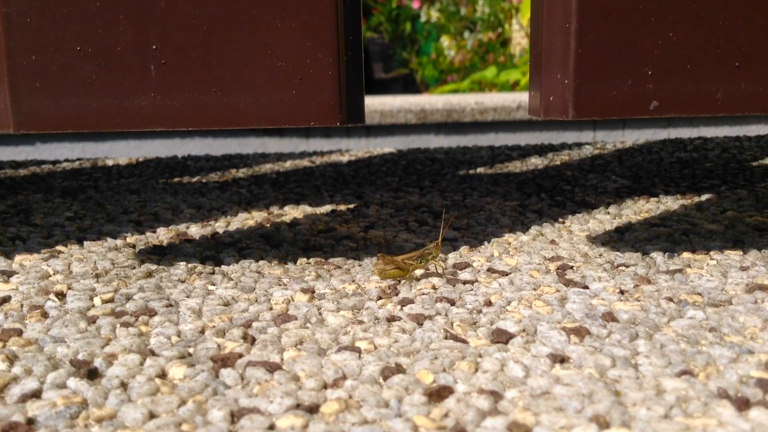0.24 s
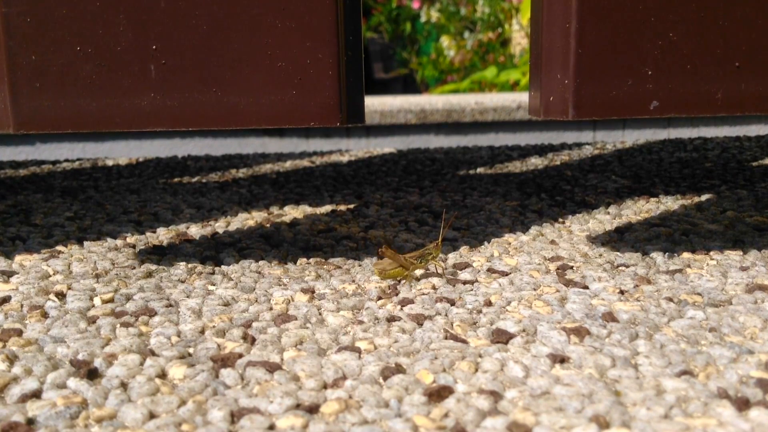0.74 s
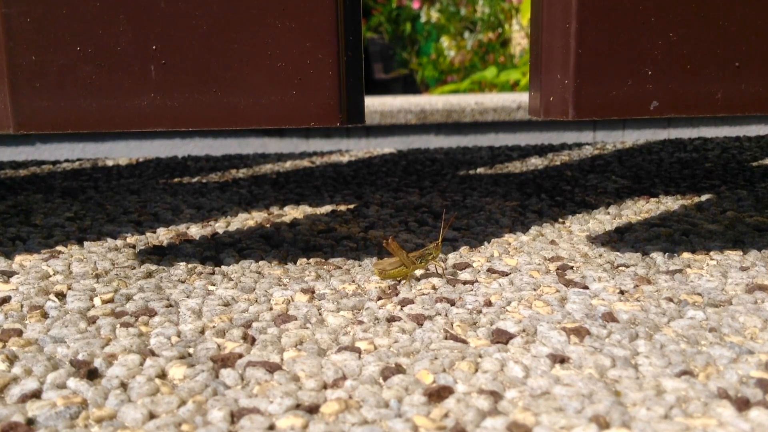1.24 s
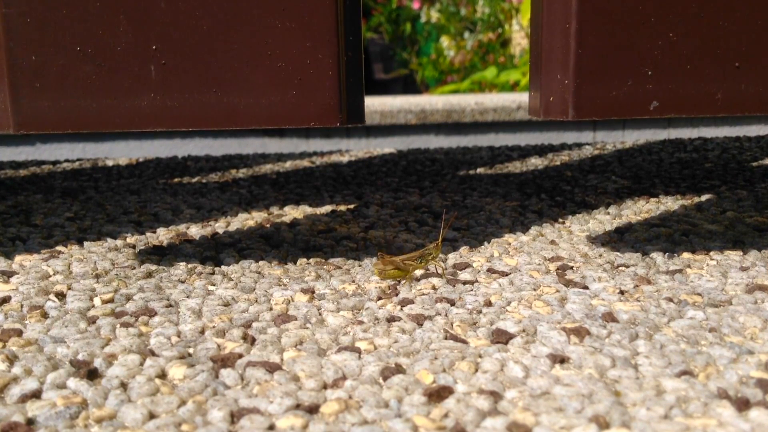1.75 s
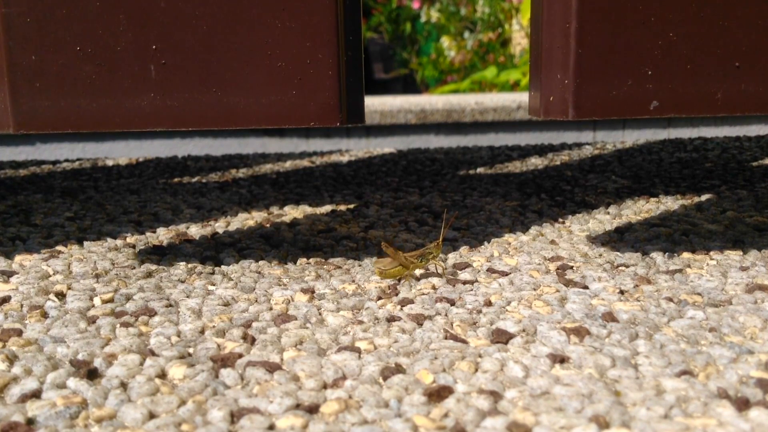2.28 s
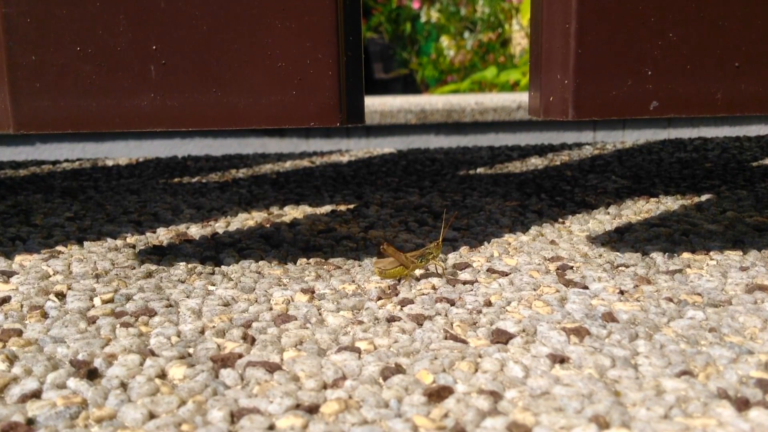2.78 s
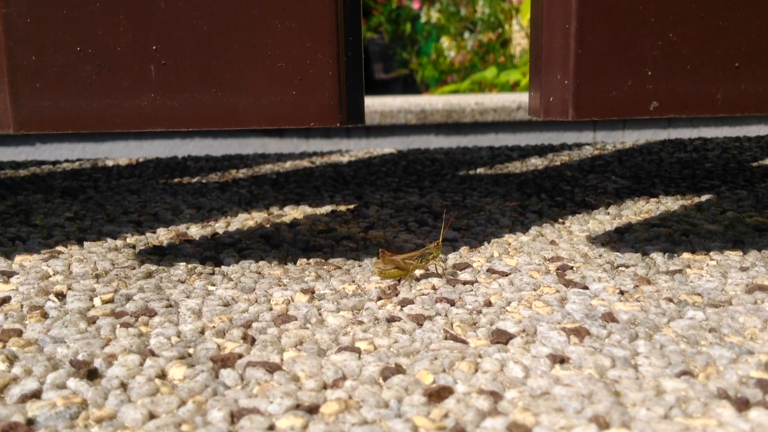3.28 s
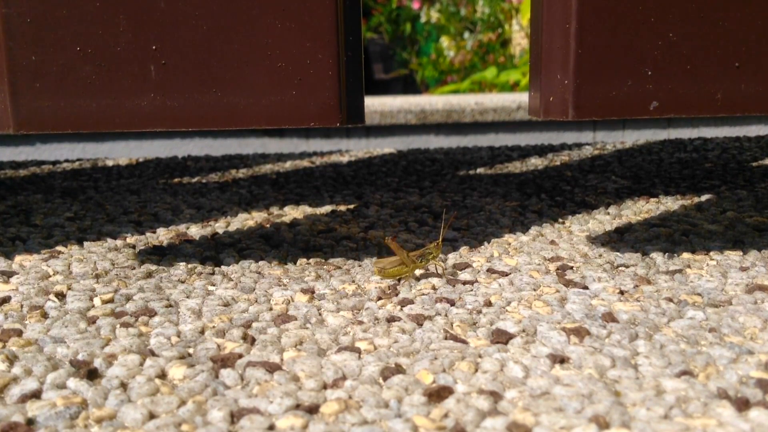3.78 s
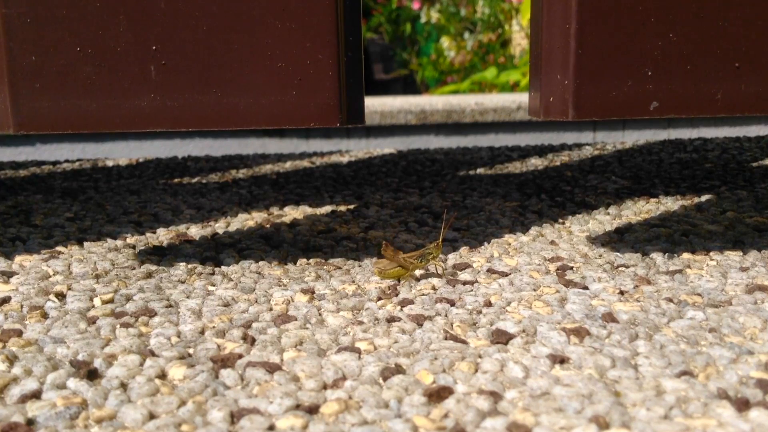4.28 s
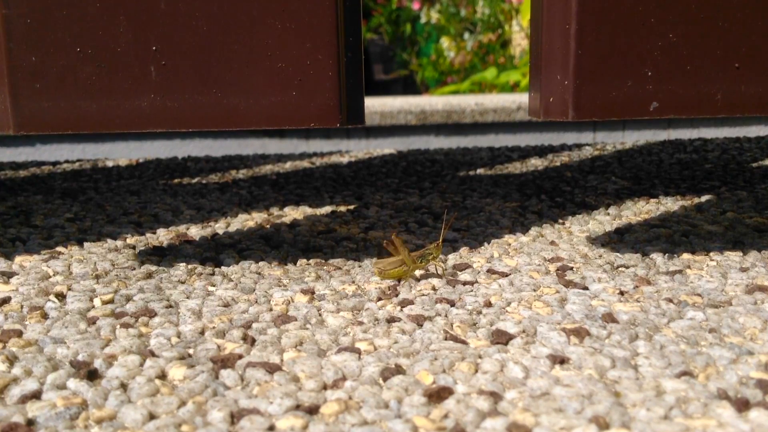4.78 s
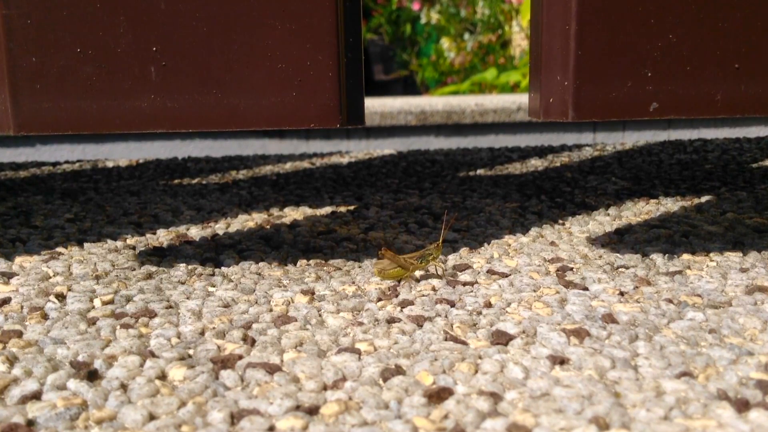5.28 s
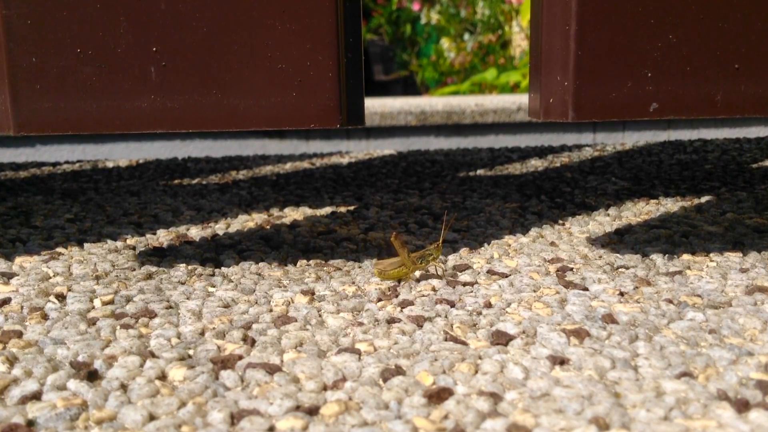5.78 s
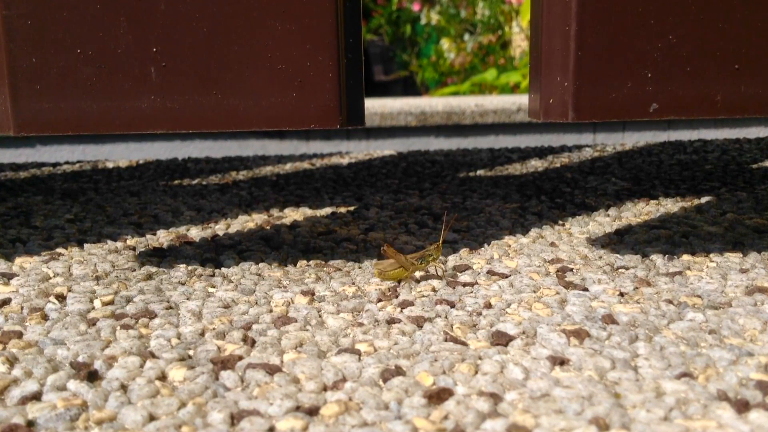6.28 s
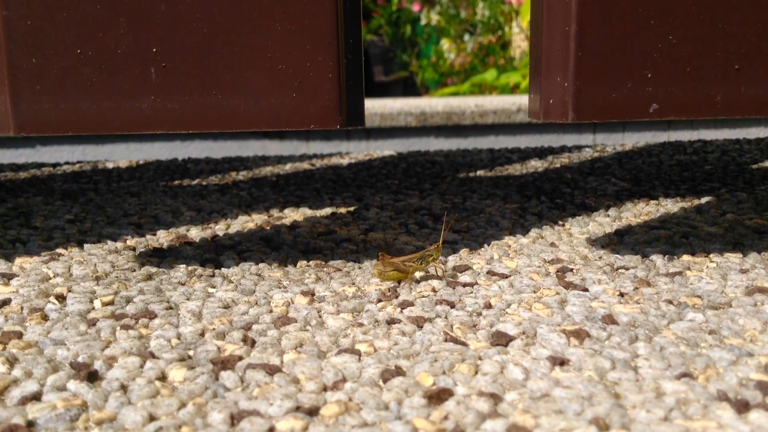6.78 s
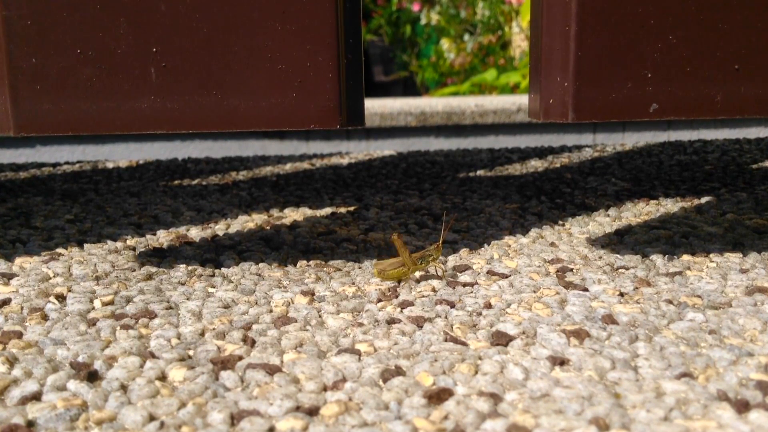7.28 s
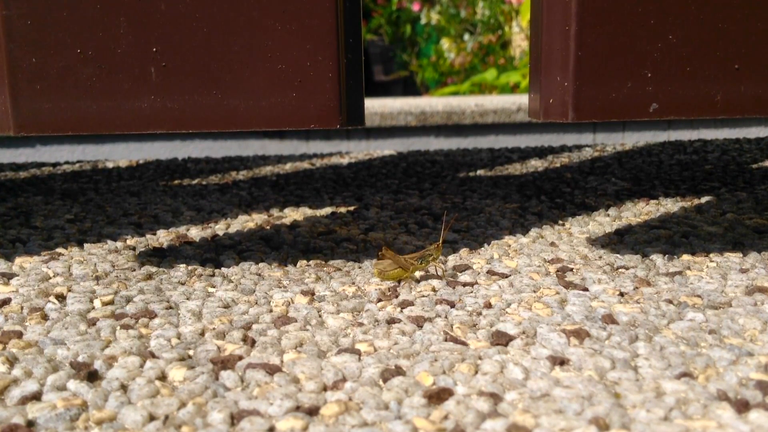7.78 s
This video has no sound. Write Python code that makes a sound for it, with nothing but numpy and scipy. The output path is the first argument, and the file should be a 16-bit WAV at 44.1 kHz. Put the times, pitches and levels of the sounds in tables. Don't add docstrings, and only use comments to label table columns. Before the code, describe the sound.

Outdoors, near the ground, a grasshopper gives a rapid pulsing buzz, very high and scratchy with no bass. Each pulse pairs a quick falling zip with two grainy scrapes. It falters once near the start, clicking irregularly, then picks up again slightly faster and keeps swelling. Pebbles add a very short scatter. A quiet distant motor comes and goes on the wind over faint hum and air. The sound is single-channel.

```python
import sys
import numpy as np
from scipy import signal
from scipy.fft import rfft, irfft, next_fast_len
from scipy.io import wavfile
from scipy.ndimage import uniform_filter1d, map_coordinates

SR = 44100
rng = np.random.default_rng(int(sys.argv[2]) if len(sys.argv) > 2 else 0)


def invert_db(level):
    return 10 ** (np.asarray(level, dtype=float) / 20)


def inscribe(sig):
    pcm = np.round(np.clip(np.atleast_2d(sig).T, -1, 1) * 32767)
    wavfile.write(sys.argv[1], SR, pcm.astype(np.int16))


N = 355005
TIME = np.arange(N) / SR

# (time [s], level of order 2 [dB], level of order 3 [dB])
ENGINE = [(0, -47, -58.5), (.3, -49, -51), (.6, -52, -54.5), (1.2, -59, -80), (1.7, -66.5, -66.5),
          (2.2, -72, -74), (2.8, -70.5, -87), (3.2, -54, -51.5), (3.45, -52, -60), (3.75, -51, -56),
          (4.05, -67, -52.5), (4.4, -61, -77), (5.1, -66, -87), (5.8, -55, -62), (6.1, -55.5, -70),
          (6.8, -53.5, -62.5), (7.4, -72, -65.5), (7.85, -56, -63)]
# (frequency [Hz], level [dB])
LOW = [(2600, -34.5), (3300, -21), (3900, -15.5), (4600, -6.5), (5500, -1.5), (6300, 0), (7500, -12)]
# (time [s], peak level [dB], halt before it [ms], hiss around it [dB])
OPENING = [
    (0.0165, -31.5, 12.7, -62),
    (.25, -21.5, 11, -62),
    (0.4862, -22.5, 8.3, -81),
    (.722, -22, 9.7, -55),
    (0.9578, -23.5, 7.5, -62),
    (1.1945, -21, 7.2, -59),
    (1.4276, -23, 9.6, -60),
    (1.654, -21, 7.4, -80),
    (1.881, -20.5, 8.4, -52),
    (2.1123, -20.5, 9.2, -83),
]
# (time [s], peak level [dB], halt before it [ms], hiss around it [dB])
RESUMED = [(2.3129, -30.5, 66, -63.5), (2.5308, -21, 6.7, -79), (2.7548, -20.5, 7.4, -60),
           (2.9734, -22.5, 2.7, -53), (3.1972, -21, 8.3, -56), (3.4175, -21.5, 2.34, -53),
           (3.638, -20.5, 1.8, -60), (3.8603, -19, 6, -55.5), (4.0793, -20, 1.8, -49),
           (4.301, -19.5, 6.9, -60), (4.519, -17.5, 8.8, -53), (4.7377, -18, 2.37, -49),
           (4.9555, -15.5, 6.2, -60.5), (5.1697, -16.5, 7, -64), (5.3905, -16, 8.2, -87),
           (5.6075, -16.5, 1.66, -56), (5.823, -15, 3.4, -45), (6.0381, -17, 5.9, -47),
           (6.256, -14.5, 6.2, -56), (6.4742, -16.5, 1.74, -47), (6.6939, -14, 5.9, -56),
           (6.912, -15.5, 1.9, -62), (7.1267, -16.5, 0.88, -45.6), (7.3404, -14, 6.2, -79),
           (7.5514, -15.5, 1.43, -83), (7.7668, -13.5, 6.5, -60), (7.982, -14.5, 9.6, -52)]


def along(points, hz):
    f, v = np.transpose([(0.53, -120)] + list(points))
    return np.interp(np.log(hz + 1), np.log(f + 1), v)


def curves(rows, at):
    places, *columns = np.transpose(rows)
    return [np.interp(at, places, column) for column in columns]


def wobble(rate):
    return map_coordinates(rng.standard_normal(int(N * rate / SR) + 4), [TIME * rate])


def coloured(x, points):
    level_db = along(points, np.fft.rfftfreq(8192, 1 / SR))
    cepstrum = irfft(np.log(invert_db(level_db) + 1e-6))
    cepstrum[1:4096] *= 2
    cepstrum[4097:] = 0
    ring = irfft(np.exp(rfft(cepstrum)))[:4096]
    return signal.fftconvolve(x, ring / np.linalg.norm(ring))[:N]


def patchy(depth_db):
    z = signal.stft(rng.standard_normal(N), nperseg=1024)[2]
    field = uniform_filter1d(rng.standard_normal(z.shape), size=3, axis=0)
    field = uniform_filter1d(field, size=7, axis=1)
    x = signal.istft(z * invert_db(depth_db * field / field.std()), nperseg=1024)[1][:N]
    return x / x.std()


def air():
    # (time [s], level [dB])
    breeze = [(0, -64), (2.7, -63), (4.4, -61.5), (5.3, -65.5), (6, -61), (6.7, -59.5), (7.2, -63),
              (8.05, -62.5)]
    # (frequency [Hz], level [dB per Hz])
    air_colour = [(150, -6), (400, -2.5), (900, 1), (1500, -3), (2000, -8.5), (2600, -7.5), (4000, -13),
                  (8000, -20), (15000, -34)]
    level_db = curves(breeze, TIME)[0] + 1.5 + 0.44 * wobble(4.8)
    return invert_db(level_db) * coloured(patchy(depth_db=2.5), air_colour)


def traffic():
    # (time [s], level [dB])
    passing = [(0, -75.5), (1.4, -68.5), (3.6, -69), (6.3, -81), (8.05, -72)]
    # (frequency [Hz], level [dB per Hz])
    deep = [(20, -19), (70, -17), (100, -4), (130, 8.5), (170, -1.5), (250, -29)]
    level_db = curves(passing, TIME)[0] + 3.0 + 0.89 * wobble(2.85)
    return invert_db(level_db) * coloured(rng.standard_normal(N), deep)


def engine_nearness():
    return uniform_filter1d(np.maximum(*curves(ENGINE, TIME)), size=SR // 4) + 55


def hum():
    # (frequency [Hz], level [dB rms])
    lines = [(126.5, -76.5), (382, -73)]
    drone_hz, rise_db_per_s = 262, 1.84
    drone_db = -71 + 0.89 * engine_nearness() + rise_db_per_s * TIME
    total = np.zeros(N)
    for hz, db in lines + [(drone_hz, drone_db), (2 * drone_hz, drone_db - 21.5)]:
        level = np.sqrt(2) * invert_db(db + 1.8 * wobble(2.94))
        turn = 2 * np.pi * np.cumsum(hz * (1 + 0.0052 * wobble(5))) / SR
        total += level * np.sin(turn)
    return total


def rumble():
    # (frequency [Hz], level [dB per Hz])
    rumble_colour = [(110, -44.5), (150, -3.5), (200, 8), (300, 1), (420, -13), (600, -10.5), (900, -31.5)]
    rise_db_per_s = 0.55
    level_db = -53.5 + 0.7 * engine_nearness() + rise_db_per_s * TIME
    level_db = level_db - 3.0 + 2.1 * wobble(7)
    return invert_db(level_db) * coloured(rng.standard_normal(N), rumble_colour)


def engine():
    # (time [s], speed [Hz])
    pace = [(0.0, 96.9), (0.8, 98.0), (2.0, 99.9), (3.2, 102.0), (3.7, 103.0), (4.8, 104.0), (6.0, 104.8),
            (8.05, 105.7)]
    # (order, level against the mean of orders 2 and 3 [dB])
    upper = [(5, -26), (6, -16.5), (8, -35), (9, -22)]
    shaft_hz = curves(pace, TIME)[0] * (1 + .004 * wobble(9))
    turn = 2 * np.pi * np.cumsum(shaft_hz) / SR
    second_db, third_db = curves(ENGINE, TIME)
    orders = [(2, second_db), (3, third_db), (4, third_db - 14)]
    orders += [(order, (second_db + third_db) / 2 + db) for order, db in upper]
    total = np.zeros(N)
    for order, db in orders:
        level = np.sqrt(2) * invert_db(db + 1.6 * wobble(8.7))
        total += level * np.sin(order * turn + rng.uniform(0, 2 * np.pi))
    return total


def gravel(x):
    t, step = np.arange(SR // 30) / SR, SR // 20
    wet = np.zeros(N + SR)
    for at in range(0, N, step):
        tail = rng.standard_normal(len(t)) * invert_db(-60 * t / 0.011)
        tail *= t > .0012
        piece = signal.fftconvolve(x[at:at + step], tail / np.linalg.norm(tail))
        wet[at:at + len(piece)] += piece
    return wet[:N]


def ticks():
    # (time [s], level [dB])
    lone_pegs = [(.0354, -51), (.0434, -50), (.048, -48), (.2694, -51), (2.1457, -44), (2.2052, -28),
                 (2.2246, -37), (2.2263, -38), (2.229, -39), (2.2308, -36), (2.2385, -39), (2.2412, -39),
                 (2.2487, -41), (2.2525, -41), (2.2615, -45), (2.2857, -53), (2.2885, -53), (2.3022, -47),
                 (2.335, -48), (2.3445, -46), (5.4255, -41), (7.5865, -42)]
    # (frequency [Hz], level [dB])
    tick_colour = [(3000, -23), (5000, -4), (7500, 5), (11000, 10), (15200, -4)]
    # start [s], stop [s], level [dB]
    start, stop, skid_db = (2.183, 2.202, -34)
    clicks, t = np.zeros(N + SR), np.arange(80) / SR
    for s, db in lone_pegs:
        catch = invert_db(-60 * t / .0035) * rng.standard_normal(len(t))
        clicks[round(s * SR):][:len(t)] += invert_db(db + 17) * catch / np.linalg.norm(catch)
    swell = np.interp(TIME, [start, stop, stop + 0.0042], [.3, 1, 0], 0, 0)
    skid = invert_db(skid_db) * swell * rng.standard_normal(N)
    return coloured(clicks, tick_colour) + coloured(skid, LOW)


def flicks():
    # (frequency [Hz], level [dB])
    wing = [(2700, -40), (3400, -40), (4200, -16.5), (5200, -3), (6600, 3.5), (8200, -2.5), (9500, -10.5)]
    # (frequency [Hz], level [dB])
    overtone = [(6000, -36), (7500, -2), (9000, -8), (11000, -4.5), (13300, -0.5), (15200, -4)]
    # (frequency [Hz], level [dB])
    scuff_colour = [(2300, -38), (3300, -17), (5200, 0), (7000, -8), (9000, -25)]
    # (frequency [Hz], level [dB])
    after = [(2500, -24), (4000, -12), (6000, -2), (7400, 0), (9000, -6), (13500, -5), (15200, -7)]
    tone, over, scuff, around = np.zeros((4, N + SR))
    t = np.arange(SR // 20) / SR
    for s, db, halt_ms, hiss_db in OPENING + RESUMED:
        length = 0.00655 + 0.00023 * s + 0.0003 * max(7.5 - halt_ms, 0)
        hz = (6617 + 39 * (db + 20.5)) * (1 + 0.0304 * rng.standard_normal())
        u = t / length
        first = round(s * SR)
        at = slice(first, first + len(t))
        fade_db = -14 * np.clip(u - .3, 0, 9) ** 1.22 - 100 * np.clip(u - 1.15, 0, 9)
        swell = np.sin(np.pi / 2 * np.clip(u / 0.28, 0, 1)) * invert_db(fade_db)
        tone_db = db - 9.5 + 0.35 * s
        for speed, leg_db, brake in ((1.13, 0, .36), (.95, rng.normal(-6, 3), .38)):
            slip = uniform_filter1d(rng.standard_normal(len(t)), size=9)
            glide = hz * (speed - brake * u.clip(0, 1.2) ** 1.53 + 0.487 * slip)
            tone[at] += invert_db(tone_db + leg_db) * swell * np.sin(2 * np.pi * np.cumsum(glide) / SR)
        over_db = db - 3 - 0.74 * (db + 20) - 1.1
        over[at] += invert_db(over_db) * np.sqrt(swell) * invert_db(-40 * np.clip(u - .95, 0, 9))
        scuff_db = db - 11 - 1.21 * s + rng.normal(0, 1.2)
        scuff[at] += invert_db(scuff_db) * swell
        around[at] += invert_db(hiss_db + 7 - 60 * t / .18) * (t < .036)
        halt = round((s - max(.009, halt_ms / 1000)) * SR)
        around[halt:first] += invert_db(hiss_db + 4)
    hiss = rng.standard_normal((3, N))
    total = coloured(tone, wing) + coloured(over[:N] * hiss[0], overtone)
    total += coloured(around[:N] * hiss[1], after)
    return total + coloured(scuff[:N] * hiss[2], scuff_colour)


def pairs():
    flick, _, halt_ms, _ = np.transpose(OPENING + RESUMED)
    s = np.append(flick[0] - .236, flick)
    stop = np.append(flick - halt_ms / 1000, N / SR + 1)
    start = s + .035 + .0004 * s
    second = s + .172 - .0007 * s
    return np.transpose([start, s + .0785, second, stop])


def hitches():
    dip_db = np.zeros(N)
    for _, first, second, stop in pairs():
        for place in (first + .008, second + .008, stop - .014):
            late, depth = rng.uniform(size=2)
            dip_db -= 13 * depth ** 1.3 * np.exp(-((TIME - place - .012 * late) / .0018) ** 2)
    return dip_db


def pegs(rate, scatter, size_db):
    turns = np.cumsum(rate * invert_db(scatter * wobble(400))) / SR
    hit = np.diff(np.floor(turns), prepend=0) > 0
    uneven_db = size_db * rng.standard_normal(N).clip(-2, 2) - np.log(10) / 20 * size_db ** 2
    return hit * invert_db(uneven_db) * np.sqrt(SR / rate)


def rasp():
    # (time [s], level [dB])
    effort = [(0, -36.5), (.8, -36), (1.6, -33.5), (2.3, -33), (3.5, -31.5), (4.4, -29.8), (5.2, -29.5),
              (6.2, -28.5), (8.05, -28.5)]
    # (phase [0 to 2, crest at 1], pressure [dB], leg speed [dB])
    stroke = [
        (0, -7.5, -7),
        (.25, -4.5, -7.5),
        (.55, -2, -5.5),
        (.85, -3, -1),
        (1, -4, 2),
        (1.17, -5.5, 0.68),
        (1.4, -10, 0.44),
        (1.7, -7, -3),
    ]
    # (phase [0 to 4], extra level [dB], growth with effort [dB per dB])
    lean = [(.5, -1.14, 1.25), (1.1, 2.13, 0.96), (1.9, -0.75, 1.15), (2.9, 0.74, 0.92), (3.6, 2.04, 1.24)]
    # (time [s], level [dB])
    stumble = [
        (2.15, 1),
        (2.201, 0),
        (2.205, -5),
        (2.25, -10),
    ]
    # (frequency [Hz], level [dB])
    husk = [(2000, -14), (2900, -4.5), (3500, -2), (4200, -6), (4900, -12), (6000, -32.5)]
    # (frequency [Hz], level [dB])
    body = [(4500, -25.5), (6000, -10), (7400, 0), (8300, 0), (9000, -4), (11000, -20)]
    # (frequency [Hz], level [dB])
    edge = [(6500, -29), (8600, -0.5), (10400, 0.5), (12500, -3.5), (15000, -4.5)]

    phase, on = np.zeros(N), np.zeros(N, bool)
    for start, first, second, stop in pairs():
        span = (TIME >= start) & (TIME < stop)
        end = min(max(stop, second + .04), second + .07)
        knots = [start, first, (first + second) / 2, second, end]
        phase[span] = np.interp(TIME[span], knots, range(5))
        on[span] = True

    extra_db, grows = curves(lean, phase)
    stumble_db = curves(stumble, TIME)[0] * (TIME < RESUMED[0][0])
    effort_db = -32 + extra_db + grows * (curves(effort, TIME)[0] + 32) + stumble_db
    effort_db = np.where(on, effort_db, -90)
    press_db, speed_db = curves(stroke + [(2, *stroke[0][1:])], phase % 2)
    low_db = -7 + 1.98 * press_db
    husk_db = -21.5 + press_db - 0.44 * np.clip(effort_db + 30, -8, 8)
    body_db = press_db - 7 * np.exp(-phase / 0.3) - 7 * np.exp((phase - 4) / 0.14)
    edge_db = speed_db - 8.5 * np.exp(-phase / .35)

    rate = 1200 * invert_db(.4 * edge_db)
    press = uniform_filter1d(invert_db(effort_db + hitches() + 0.36 * wobble(90)), size=40)
    legs = (pegs(rate, 2.5, 1.4) + pegs(1.1 * rate, 2.4, 2.8)) / np.sqrt(2)

    def scrape(share):
        return np.sqrt(1 - share) * legs + np.sqrt(share) * rng.standard_normal(N)

    wing = coloured(press * invert_db(low_db + 1.4 * wobble(70)) * scrape(0.78), LOW)
    wing += coloured(press * invert_db(husk_db) * scrape(0.5), husk)
    wing += coloured(press * invert_db(body_db) * scrape(0.38), body)
    wing += coloured(press * invert_db(edge_db + 0.58 * wobble(60)) * scrape(0.49), edge)
    return wing


def scene():
    # (frequency [Hz], level [dB])
    small_body = [(1900, -22), (3200, 0), (20000, 0)]
    background = air() + traffic() + hum() + rumble() + engine()
    insect = coloured(rasp() + flicks() + ticks(), small_body)
    return (insect + invert_db(-11.0) * gravel(insect) + background)[None]


def low_pass(x):
    return signal.sosfilt(signal.butter(12, 16520, fs=SR, output="sos"), x)


def record(dry):
    # (frequency [Hz], level [dB])
    top = [(15240, 0), (15300, -24), (15600, -42), (16400, -44), (16600, -75)]
    size = next_fast_len(N + 8192)
    hz, db = np.transpose(top)
    gain = invert_db(np.interp(np.fft.rfftfreq(size, 1 / SR), hz, db))
    mix = irfft(rfft(dry, size) * gain, size)[:, :N]
    return low_pass(mix)


dry = scene()
out = record(dry)
inscribe(out)
```